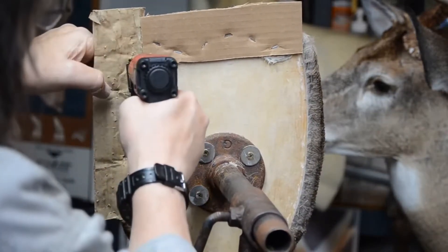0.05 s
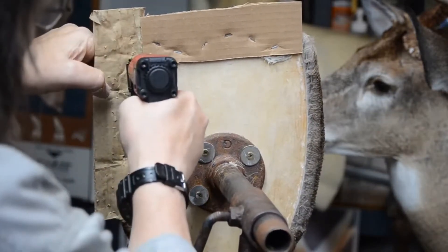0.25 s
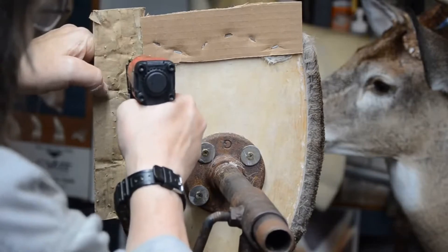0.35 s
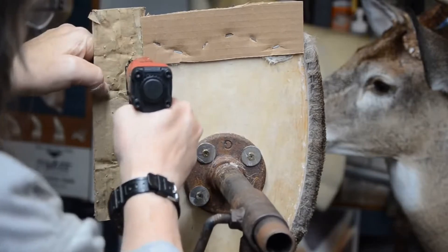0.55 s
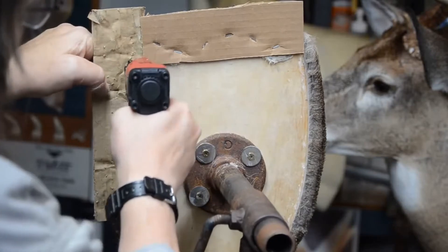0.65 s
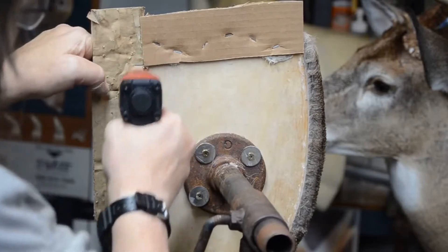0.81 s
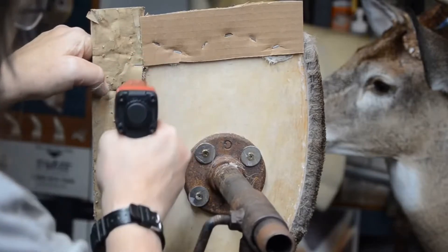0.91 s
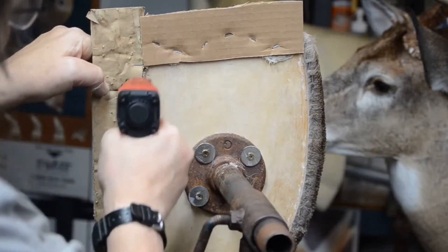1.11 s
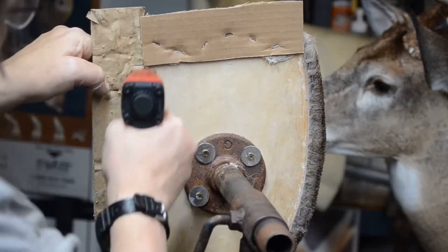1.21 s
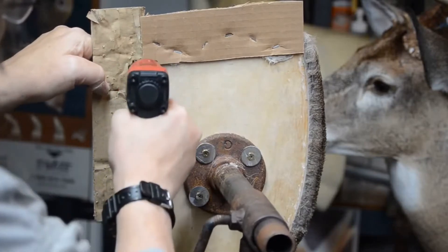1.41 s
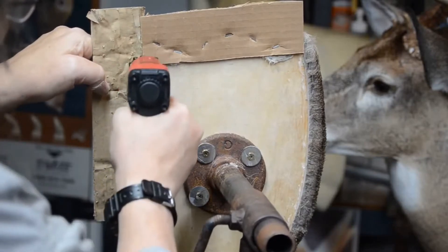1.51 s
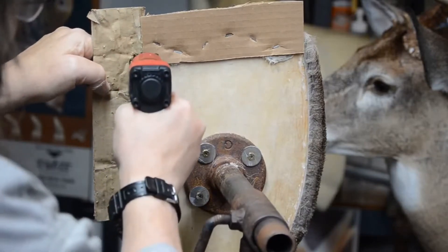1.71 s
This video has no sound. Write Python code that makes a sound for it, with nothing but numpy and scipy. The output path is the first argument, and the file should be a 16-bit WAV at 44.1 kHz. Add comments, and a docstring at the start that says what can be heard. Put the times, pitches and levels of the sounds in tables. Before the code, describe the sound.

A pneumatic staple gun snaps twice in quick succession, tacking cardboard to wood in a small workshop

```python
"""Over quiet room noise a hand shifts softly; then an air-driven staple gun, close by in a small workshop,
tacks cardboard to a wooden form. It snaps twice, on the drive stroke and on the return: each time air leaks,
then blasts (shaped noise), and the piston hits its stop (a pressure swing and a burst of noise),
ringing tool and board (decaying modes). The trigger clicks back softly; the hand shifts again."""
import sys
import numpy as np
from scipy import signal
from scipy.fft import rfft, irfft
from scipy.io import wavfile

SR = 44100
rng = np.random.default_rng(int(sys.argv[2]) if len(sys.argv) > 2 else 0)


def log_audio(samples):
    """Write samples as a 16-bit WAV file to the path given in sys.argv[1]."""
    # one column per channel
    frames = np.atleast_2d(samples).T
    # limit to full scale, then quantise
    limited = np.clip(frames, -1, 1)
    pcm = np.round(limited * 32767).astype(np.int16)
    wavfile.write(sys.argv[1], SR, pcm)


N = 77175
T = np.arange(N) / SR  # time axis, s
MID_TO_SIDE = np.array([[1], [-1]])  # side signal: opposite sign in the two ears

# steady background spectrum: f/Hz, density/dB per Hz
FLOOR_SPECTRUM = [(25, -20.5), (60, -0.5), (145, -1), (190, -2), (245, 2.5), (300, -7), (450, -5),
                  (800, -8), (1500, -12), (3000, -19.5), (5500, -24), (10000, -23), (16000, -21.5)]
# stereo width of the background: f/Hz, side level/dB
FLOOR_SIDE = [(60, -16.5), (300, -11.5), (900, -5), (2200, -2.5), (4500, 1), (7000, -18), (10000, -28)]
FLOOR_DB = -57
# hand and sleeve shifting: t middle/s, half length/s, level/dB, brightness/dB per octave
SHIFTS = [(0.064, 0.069, -58, -15.5), (0.88, .14, -57.5, -3.5), (1.323, .015, -59, 0.5),
          (1.521, 0.0043, -58, 2.5), (1.574, 0.098, -57, 0)]
# rustle of the sleeve: f/Hz, density/dB per Hz
RUSTLE_SPECTRUM = [(40, -20.5), (100, -13.5), (148, 7), (190, -6.5), (245, -8), (330, -0.5), (600, -4),
                   (1500, -19.5), (5000, -36.5)]

# colour of the workshop reverberation: f/Hz, level/dB
ROOM_COLOUR = [(80, -20.5), (250, -4.5), (700, -1), (1500, -1), (2800, -2.5), (5500, -14.5), (9000, -2),
               (15000, -13)]
# decay of the workshop reverberation: f/Hz, t60/s
ROOM_T60 = [(100, 0.12), (700, 0.25), (2000, 0.26), (5000, 0.19), (14000, 0.21)]
ROOM_DB, ROOM_SIDE_DB, ROOM_BUILD_S = -12, -34, 0.0032

# trigger clicks: t/s, level/dB
TRIGGER_CLICKS = [(0.6994, -44), (0.7003, -36), (0.7069, -43), (0.7100, -47)]
# trigger modes: f/Hz, level/dB, t60/s
TRIGGER_MODES = [(265, -8.5, .04), (462, -4, 0.045), (623, 2, 0.019), (1250, -18, 0.017),
                 (1870, -10.5, .015), (2730, -7.5, 0.018), (3490, -2, .004), (5800, -2.5, 0.0016)]
TRIGGER_TICK_DB = -4

# rushes of air: t start/s, rise/s, hold/s, fall/dB per s, level/dB, treble/dB per octave,
# low puff/dB, stereo width/dB, room send/dB, shaking of the board/dB
RUSHES = [(0.214, 0.012, 0.0047, 598, -37.5, -1.5, -51.5, 0.5, -3.5, -46),
          (0.2355, 0.0024, 0.0043, 705, -17.5, -0.45, -34, -9.5, -8.5, -24.5),
          (0.248, 0.0045, 0.005, 1104, -19, -3.2, -45, -14, -9.5, -34.5),
          (0.3578, 0.032, .022, 495.5, -25.5, 0.5, -35.5, -47, 0.5, -42),
          (0.4, 0.0044, 0.0024, 903, -12.5, 1.0, -19, -47.5, -4, -34.5)]
# jet through the valve ports: f/Hz, density/dB per Hz
JET_SPECTRUM = [(30, -30), (100, -16), (300, -9.5), (900, 0), (1400, -6.5), (2200, -5), (3300, -5),
                (4400, -6), (5300, 1.5), (6000, 3.5), (6900, -3), (8500, -7.5), (10800, -9.5),
                (12400, -0.5), (14000, -4), (16000, -9.5)]
# puff of displaced air: f/Hz, density/dB per Hz
PUFF_SPECTRUM = [(25, -20), (55, -5), (100, -1), (200, -8), (380, -1), (600, -7), (1000, -19.5),
                 (2500, -56)]
TURBULENCE_DB, TURBULENCE_HZ = 1.3, 600  # rms level flutter, its low-pass cutoff

# piston blows: t/s, thump/dB, thump width/s, metal crack/dB, board ring/dB, tool ring/dB,
# shudder/dB, shudder t60/s, shudder brightness/dB per octave, echo delay/s
BLOWS = [(0.2501, -1.5, 0.00023, -20.5, -23, -30.5, -30.5, 0.45, -1, .0044),
         (0.4204, -8.5, .00026, -3.5, -30.5, -24.5, -28, 0.16, 5, 0.0037)]
# metal crack: f/Hz, density/dB per Hz
CRACK_SPECTRUM = [(300, -11), (1000, 6.5), (2000, 7.5), (3000, 2), (4200, 3.5), (5400, 15), (6500, -2.5),
                  (9000, -26), (16000, -24.5)]
# board's short knock under the blow: f/Hz, level/dB re thump, t60/s
KNOCK_MODES = [(697.6, -15, 0.031), (993, -8.5, .02), (1650, -16, .015)]
# board modes: f/Hz, level/dB, t60/s
BOARD_MODES = [(215, -13, 0.14), (270.7, -8, 0.12), (344.5, -0.5, 0.11), (474, -11.5, .06),
               (631.6, -3, 0.16), (670, -7, .09), (785, -6, .06), (923, -15, 0.0725), (922, 9, 0.073),
               (1076, -8, .1)]
# tool modes: f/Hz, level/dB, t60/s
TOOL_MODES = [(1040, -7.5, 0.025), (1220, -7, .08), (1435, -7, 0.091), (1630, -10, 0.1),
              (1760, -4.5, 0.097), (2070, 3, 0.027), (2220, -7, 0.16), (3090, -10.5, 0.05),
              (5190, -12, .05), (5500, -10.5, .05)]
# shudder of the many close modes of board and fittings: f/Hz, density/dB per Hz
SHUDDER_SPECTRUM = [(60, -37.5), (150, -17), (320, -2), (480, -7.5), (660, 4.5), (900, 3.5), (1200, -1.5),
                    (1600, 2), (2300, 0), (3200, -2.5), (4500, -9), (7000, -20.5), (16000, -34.5)]
CRACK_T60_S, CRACK_LEAD_S, CRACK_HOLD_S = 0.0037, 0.0007, 0.0013
CRACK_SIDE_DB, SHUDDER_SIDE_DB = -47, -26
ECHO_DB, ECHO_CUT_HZ = -8.5, 7500

# automatic gain control: slope is dB of gain cut per dB over threshold
AGC_THRESHOLD_DB, AGC_SLOPE, AGC_ATTACK_S, AGC_RELEASE_DB_PER_S = -14, 0.25, 0.014, 20.5
LOW_CUT_HZ, TOP_STOP_HZ, PEAK_CEILING = 12, 16600, 0.9


def from_db(db):
    """Decibels to amplitude gain."""
    return 10 ** (np.asarray(db) / 20)


def at_hz(points, hz):
    """Interpolate a table on a log-frequency axis."""
    table_hz, values = np.transpose(points)
    return np.interp(np.log(np.maximum(hz, 1)), np.log(table_hz), values)


def noise(spectrum, tilt_db=0, pivot_hz=1000):
    """Random-phase noise of rms 1 with a given spectrum, tilted in dB per octave about the pivot."""
    hz = np.maximum(np.arange(N // 2 + 1) * SR / N, 1)
    octaves = np.log2(np.maximum(hz, spectrum[0][0]) / pivot_hz)
    gain = from_db(at_hz(spectrum, hz) + tilt_db * octaves)
    x = irfft(gain * np.exp(2j * np.pi * rng.random(len(hz))), N)
    return x / x.std()


def wide(spectrum, side_db, tilt_db=0):
    """Stereo noise: a common part plus an independent side part at side_db."""
    mid = noise(spectrum, tilt_db)
    side = noise(spectrum, tilt_db)
    return mid + from_db(side_db) * side * MID_TO_SIDE


def clicks(times_s, db):
    """One single-sample impulse per time."""
    out = np.zeros(N)
    np.add.at(out, (np.asarray(times_s) * SR).astype(int), from_db(db))
    return out


def dying(start_s, t60_s, hold_s=0):
    """Envelope: sudden start, hold, exponential decay of 60 dB per t60."""
    age_s = np.maximum(T - start_s - hold_s, 0)
    return (T > start_s) * np.exp(-np.log(1000) * age_s / t60_s)


def low_pass(x, order, hz):
    """Butterworth low-pass."""
    return signal.sosfilt(signal.butter(order, hz, fs=SR, output="sos"), x)


def ring(x, modes):
    """Excite a bank of two-pole resonators, summed with alternating sign."""
    out = 0
    for k, (hz, db, t60_s) in enumerate(modes):
        radius = from_db(-60 / (t60_s * SR))
        w = 2 * np.pi * hz / SR
        poles = [1, -2 * radius * np.cos(w), radius * radius]
        mode = signal.lfilter([0, np.sin(w)], poles, x + 1e-18)  # offset avoids denormals
        out = out + (-1) ** k * from_db(db) * mode
    return out


def background():
    """Steady room noise, with Gaussian swells of rustle as hand and sleeve move."""
    rustle = 0
    for middle_s, half_s, db, tilt_db in SHIFTS:
        swell = np.exp(-((T - middle_s) / half_s) ** 2 / 2)
        rustle = rustle + from_db(db) * swell * noise(RUSTLE_SPECTRUM, tilt_db)
    side_gain = from_db(at_hz(FLOOR_SIDE, np.arange(N // 2 + 1) * SR / N))
    side = irfft(rfft(noise(FLOOR_SPECTRUM)) * side_gain, N)
    return from_db(FLOOR_DB) * (noise(FLOOR_SPECTRUM) + side * MID_TO_SIDE) + rustle


def workshop(x):
    """Reverberation: dense reflections build up quickly and die at their own rate in each band."""
    t = T[:SR // 2]
    edges_hz = np.geomspace(50, 18000, 14)
    white = rng.standard_normal((2, 2, len(t)))  # neighbouring bands alternate between two sources
    response = 0  # rows: mid, side
    for k, (low, high) in enumerate(zip(edges_hz, edges_hz[1:])):
        hz = np.sqrt(low * high)
        band_pass = signal.butter(2, [low, high], "band", fs=SR, output="sos")
        band = signal.sosfilt(band_pass, white[k % 2])
        build = 1 - np.exp(-(t / ROOM_BUILD_S) ** 2)
        shape = build * np.exp(-np.log(1000) * t / at_hz(ROOM_T60, hz))
        response = response + from_db(at_hz(ROOM_COLOUR, hz)) * band * shape / np.linalg.norm(shape)
    mid, side = signal.fftconvolve(x.mean(axis=0)[None], response, axes=1)[:, :N]
    return from_db(ROOM_DB) * (mid + from_db(ROOM_SIDE_DB) * side * MID_TO_SIDE)


def trigger():
    """The trigger springs back and bounces in its housing: impulses excite its modes."""
    taps = clicks(*np.transpose(TRIGGER_CLICKS))
    return ring(taps, TRIGGER_MODES) + from_db(TRIGGER_TICK_DB) * taps


def air():
    """Air rushes swell, hold and die: turbulent hiss, low puff, shaken board; returns direct, to walls."""
    direct, to_walls = 0, 0
    for start_s, rise_s, hold_s, fall, db, tilt_db, puff_db, side_db, room_db, shake_db in RUSHES:
        age_s = T - start_s
        fall_db = fall * np.maximum(age_s - rise_s - hold_s, 0)
        flow = np.clip(age_s / rise_s, 0, 1) * from_db(-fall_db)
        flutter = low_pass(rng.standard_normal(N), 2, TURBULENCE_HZ)
        hiss_db = db + TURBULENCE_DB * flutter / flutter.std()
        hiss = from_db(hiss_db) * wide(JET_SPECTRUM, side_db, tilt_db)
        puff = from_db(puff_db) * noise(PUFF_SPECTRUM)
        shake = from_db(shake_db) * noise(SHUDDER_SPECTRUM)
        rush = flow * (hiss + puff + shake)
        direct = direct + rush
        to_walls = to_walls + from_db(room_db) * rush
    return direct, to_walls


def piston():
    """Blows: a pressure swing and metal crack, echoed close by; board and tool knock, shudder, ring."""
    out = 0
    for (hit_s, thump_db, width_s, crack_db, board_db, tool_db,
         shudder_db, shudder_t60_s, tilt_db, delay_s) in BLOWS:
        u = (T - hit_s) / width_s
        thump = from_db(thump_db) * u * np.exp((1 - u * u) / 2)  # opposite peaks at u = -1, +1
        crack_shape = dying(hit_s - CRACK_LEAD_S, CRACK_T60_S, CRACK_HOLD_S)
        crack = from_db(crack_db) * crack_shape * wide(CRACK_SPECTRUM, CRACK_SIDE_DB)
        hit = thump + crack
        echo = low_pass(np.roll(hit, int(delay_s * SR), axis=1), 1, ECHO_CUT_HZ)
        knock = ring(clicks([hit_s], [thump_db]), KNOCK_MODES)
        board = ring(clicks([hit_s], [board_db]), BOARD_MODES)
        tool = ring(clicks([hit_s], [tool_db]), TOOL_MODES)
        shudder_noise = wide(SHUDDER_SPECTRUM, SHUDDER_SIDE_DB, tilt_db)
        shudder = from_db(shudder_db) * dying(hit_s, shudder_t60_s) * shudder_noise
        out = out + hit + from_db(ECHO_DB) * echo + knock + board + tool + shudder
    return out


def scene():
    """The gun in its room: direct sounds, reverberation, background."""
    rushes, rushes_to_walls = air()
    knocks = piston() + trigger()
    return rushes + knocks + workshop(rushes_to_walls + knocks) + background()


def record(dry):
    """Gain dips after loud peaks and creeps back; rumble is cut, peaks are rounded, the top is cut."""
    level_db = 20 * np.log10(np.abs(dry).max(axis=0) + 1e-9)
    over_db = np.maximum(level_db - AGC_THRESHOLD_DB, 0)
    release_db = AGC_RELEASE_DB_PER_S * T
    # peak hold that falls linearly in dB
    held_db = np.maximum.accumulate(AGC_SLOPE * over_db + release_db) - release_db
    r = np.exp(-1 / (AGC_ATTACK_S * SR))
    cut_db = signal.lfilter([1 - r], [1, -r], held_db)
    x = dry * from_db(-cut_db)
    x = signal.sosfilt(signal.butter(1, LOW_CUT_HZ, "high", fs=SR, output="sos"), x)
    rounded = PEAK_CEILING * np.tanh(x / PEAK_CEILING)
    return signal.sosfilt(signal.cheby2(18, 70, TOP_STOP_HZ, fs=SR, output="sos"), rounded)


dry = scene()
out = record(dry)
log_audio(out)
```